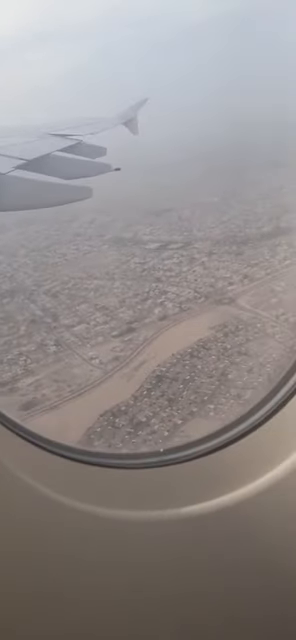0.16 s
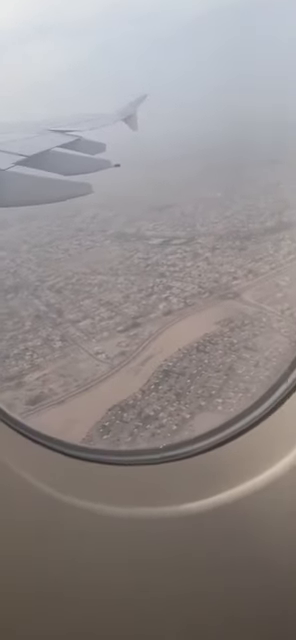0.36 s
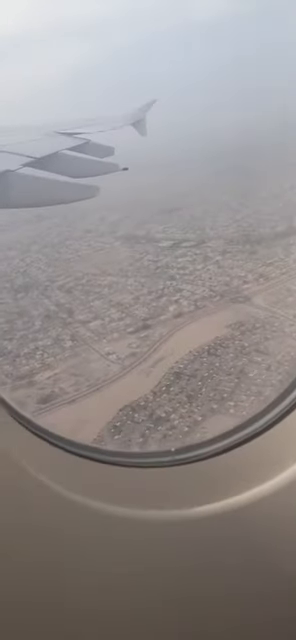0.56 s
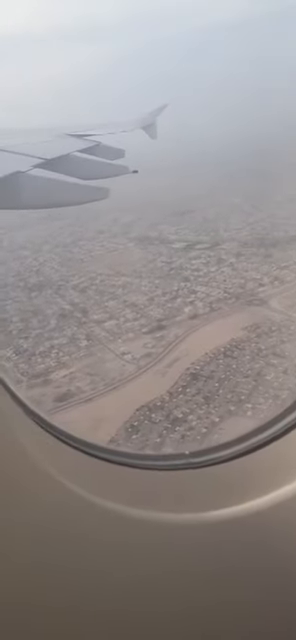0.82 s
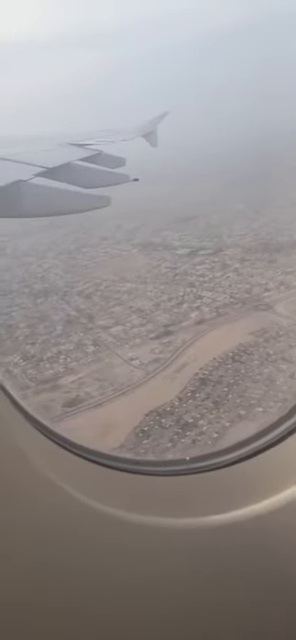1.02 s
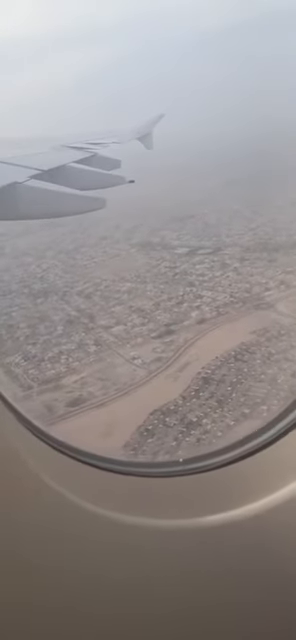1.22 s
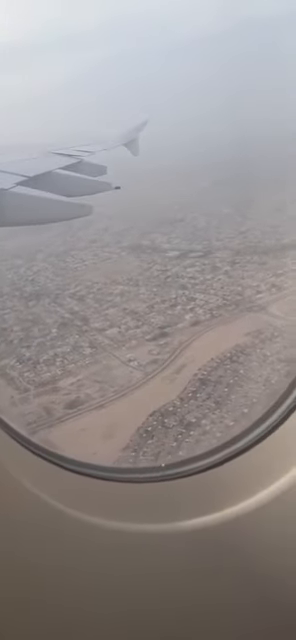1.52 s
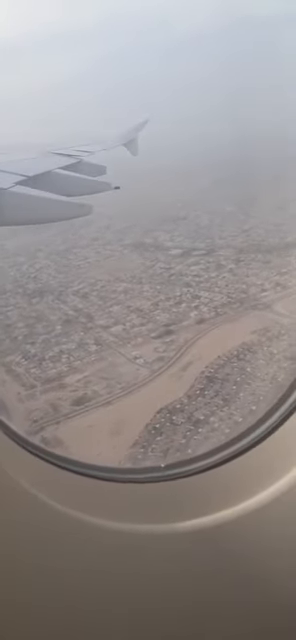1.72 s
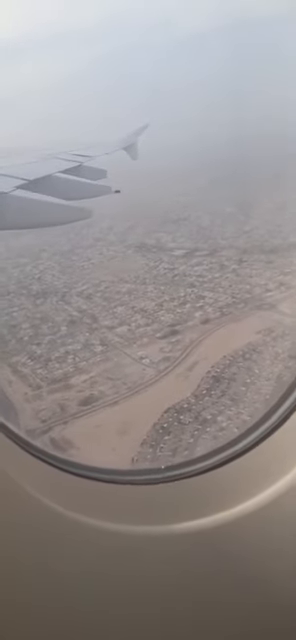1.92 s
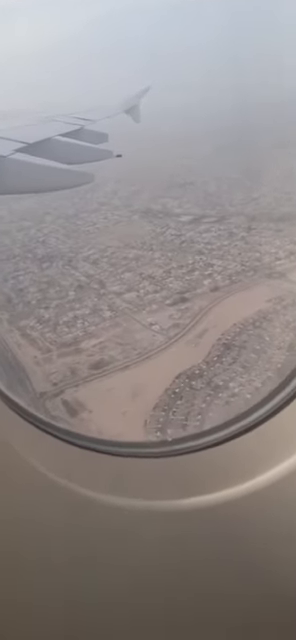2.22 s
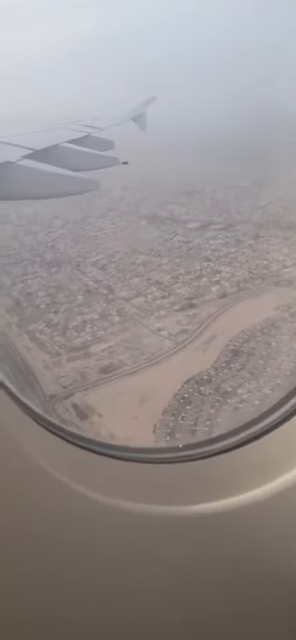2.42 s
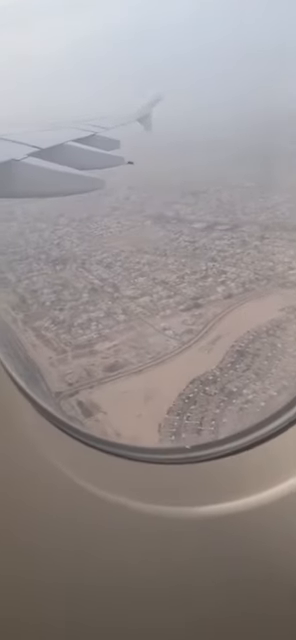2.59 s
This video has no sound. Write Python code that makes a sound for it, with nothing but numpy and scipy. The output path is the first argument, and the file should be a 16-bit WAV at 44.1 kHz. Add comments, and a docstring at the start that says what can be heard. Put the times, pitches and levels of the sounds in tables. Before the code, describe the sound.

Jet engine roar heard inside an airliner cabin at a window seat: deep, boomy rumble surging unevenly throughout, with muffled air rush, faint vent hiss and thin whines; close handheld stereo microphone, slightly stronger on the left.

```python
"""Jet exhaust rumbles through the fuselage of an airliner climbing after takeoff, heard behind the wing.
The rumble is shaped noise in four surging ranges; a narrow resonance throbs as the cabin's boom, with a
quieter hum about an octave below. Shaped noise also makes the air rush over the skin and the vent hiss.
Sines make the thin whines of spinning machinery; resonant noise makes a vent whistle and squeaks of the
trim, and short bursts of noise make its ticks."""
import sys
import numpy as np
from scipy import signal
from scipy.fft import rfft, irfft
from scipy.io import wavfile
from scipy.ndimage import uniform_filter1d

SR = 44100
rng = np.random.default_rng(int(sys.argv[2]) if len(sys.argv) > 2 else 0)


def inscribe(sig):
    """Save sig as 16-bit PCM at rate SR to the path in sys.argv[1].

    A 1-D sig is mono; a 2-D sig holds one channel per row.
    Samples are clipped to [-1, 1] before scaling.
    """
    pcm = np.round(np.clip(np.atleast_2d(sig).T, -1, 1) * 32767)
    wavfile.write(sys.argv[1], SR, pcm.astype(np.int16))


N = 121275
TIME = np.arange(N) / SR  # s
FREQS = np.maximum(np.arange(N // 2 + 1) * SR / N, 1)  # Hz, kept above zero for the logarithm


def from_db(db):
    """Decibels to gain."""
    return 10 ** (np.asarray(db) / 20)


def rms_one(x):
    """Scale to unit power."""
    return x / np.sqrt(np.mean(np.abs(x) ** 2) + 1e-20)


def at_hz(points, freqs=FREQS):
    """Read a table along log frequency."""
    hz, value = np.transpose(points)
    return np.interp(np.log(freqs), np.log(hz), value)


def over_time(points):
    """Read a table along time, with straight lines between its points."""
    return np.interp(TIME, *np.transpose(points))


def sides(pan_db):
    """Left and right gains for a level difference, left minus right."""
    return from_db(np.array([[.5], [-.5]]) * pan_db)


def drift(rate_hz):
    """Slow random movement with a spread of about 1: noise that falls away above rate_hz."""
    hz = np.arange(N + 1) * SR / (2 * N)
    noise = rfft(rng.standard_normal(2 * N))
    slow = irfft(noise / (1 + (hz / rate_hz) ** 2))
    return rms_one(slow)[:N]


def surge(level, swing):
    """Gain that follows a share of a level curve's swing about its mean."""
    db = over_time(level)
    return from_db(swing * (db - db.mean()))


def evened(x, steady):
    """Smooth out chance swells of noise; steady is 0-1."""
    power = np.mean(x ** 2, axis=0)
    for _ in range(2):
        power = uniform_filter1d(power, size=1800)  # about 41 ms
    return x * (power.mean() / power) ** (np.clip(steady, 0, 1) / 2)


def turbulence(spectrum, pan_db, likeness):
    """Stereo noise of a given density, balance and likeness between the sides."""
    mid, side = rfft(rng.standard_normal((2, N)))
    alike = np.clip(likeness, 0, 1)
    pair = np.sqrt(1 + alike) * mid + np.sqrt(1 - alike) * side * [[1], [-1]]
    density = from_db(at_hz(spectrum)) * np.sqrt(SR) / 2
    return irfft(pair * sides(pan_db) * density, N)


def resonance(hz, width_hz, steady):
    """Noise ringing in a narrow resonance whose centre may move; steady (0-1) evens out its swells."""
    swell = rms_one(drift(width_hz * .7) + 1j * drift(width_hz * .7))
    swell = swell / (np.abs(swell) ** 2 + 0.14) ** (np.clip(steady, 0, 1) / 2)
    phase = 2 * np.pi * np.cumsum(hz * np.ones(N)) / SR
    return rms_one((swell * np.exp(1j * phase)).real)


def right_later(x, lag):
    """Delay the right side by a lag that depends on frequency; the end is mirrored to avoid a jump."""
    hz = np.arange(N + 1) * SR / (2 * N)
    turn = np.exp(-2j * np.pi * hz * at_hz(lag, np.maximum(hz, 1)))
    mirrored = np.hstack([x[1], x[1, ::-1]])
    return np.array([x[0], irfft(rfft(mirrored) * turn)[:N]])


TRIM_PAN_DB = -14  # left minus right, for ticks and squeaks
TICK_RISE_S = 0.012
# faint ticks of the cabin trim: start_s, level_db, centre_hz
TRIM_TICKS = [(1.295, -50, 1400), (2.006, -50.5, 1710)]


def trim_ticks():
    """Plastic panels slip: brief soft bursts of noise in a band about an octave wide."""
    out = np.zeros((2, N))
    for start_s, level_db, centre_hz in TRIM_TICKS:
        age = np.maximum(TIME - start_s, 0) / TICK_RISE_S
        envelope = age * np.exp(1 - age)  # peaks at 1 after the rise time
        edges_hz = [centre_hz / np.sqrt(2), centre_hz * np.sqrt(2)]
        band = signal.butter(1, edges_hz, "band", fs=SR, output="sos")
        rub = signal.sosfilt(band, signal.sosfilt(band, rng.standard_normal((2, N))))
        out += from_db(level_db) * envelope * rms_one(rub)
    return out * sides(TRIM_PAN_DB)


SQUEAK_WIDTH_HZ, SQUEAK_STEADY = 25, .9  # steady: 0-1
# faint squeaks of the trim: middle_s, length_s, level_db, pitch_hz
TRIM_SQUEAKS = [(.16, .07, -47, 2920), (.335, .05, -55, 2900), (2.22, .05, -49.5, 2690),
                (2.04, .13, -65, 3815)]


def trim_squeaks():
    """A panel edge sings for a moment as it rubs: a narrow resonance under a flat-topped swell."""
    out = np.zeros(N)
    for middle_s, length_s, level_db, pitch_hz in TRIM_SQUEAKS:
        envelope = np.exp(-(2 * (TIME - middle_s) / length_s) ** 4)
        out += from_db(level_db) * envelope * resonance(pitch_hz, SQUEAK_WIDTH_HZ, SQUEAK_STEADY)
    return out * sides(TRIM_PAN_DB)


WHISTLE_HZ, WHISTLE_WIDTH_HZ, WHISTLE_STEADY = 2590, 40, .1  # steady: 0-1
WHISTLE_WANDER_HZ, WHISTLE_WANDER_RATE_HZ = 45, 11
WHISTLE_DB, WHISTLE_PAN_DB = -54.5, -12


def vent_whistle():
    """A breathy whistle wavers inside the hiss: a narrow resonance with a wandering centre."""
    hz = WHISTLE_HZ + WHISTLE_WANDER_HZ * drift(WHISTLE_WANDER_RATE_HZ)
    whistle = resonance(hz, WHISTLE_WIDTH_HZ, WHISTLE_STEADY)
    return from_db(WHISTLE_DB) * whistle * sides(WHISTLE_PAN_DB)


WHINE_WANDER, WHINE_WANDER_RATE_HZ = .0007, 5  # wander as a share of the speed
WHINE_FLICKER_DB, WHINE_FLICKER_RATE_HZ = 2.2, 6


def rotor_speed():
    """Relative speed of a rotor, wandering slightly about 1."""
    return 1 + WHINE_WANDER * drift(WHINE_WANDER_RATE_HZ)


def tone(hz, speed, db, pan_db):
    """A thin sine that follows a rotor's relative speed and flickers in level."""
    level = from_db(db + WHINE_FLICKER_DB * drift(WHINE_FLICKER_RATE_HZ))
    sine = np.sqrt(2) * np.sin(2 * np.pi * np.cumsum(hz * speed) / SR)
    return sine * level * sides(pan_db)


WHINE_TRIM_DB = 1.2
# whines of compressor and cabin blowers; level is before the trim, at mid-scene:
# pitch_hz, level_db, left_minus_right_db, rise_db_per_s
MACHINE_WHINES = [(2322, -51.5, -6, 1.4), (3310, -64, -9, 1), (6399, -74.5, -2, -1.5), (6464, -82, -3, -2),
                  (6525, -81, -6, -2), (6743, -73.5, 0, -1), (6928, -84, -8, 0)]


def machine_whines():
    """Compressor and blower whines, each wandering by itself and slowly rising, fading or holding."""
    out = np.zeros((2, N))
    for pitch_hz, level_db, pan_db, rise_db_per_s in MACHINE_WHINES:
        db = level_db + WHINE_TRIM_DB + rise_db_per_s * (TIME - TIME.mean())
        out += tone(pitch_hz, rotor_speed(), db, pan_db)
    return out


FAN_HZ, FAN_TRIM_DB = 61.87, -0.1  # shaft turns per second; level trim
# buzz tones of the engine fan, before the trim and swell:
# shaft_multiple, level_db, left_minus_right_db
FAN_TONES = [(18, -67.5, 4), (21, -60.7, -3), (31, -56.8, -3), (34, -65, -11), (44, -63, -12),
             (47, -67, -12), (65, -72.5, -5)]
# their shared swell: time_s, gain_db
FAN_SWELL = [(0, 2), (.8, 1), (1.5, 3.5), (2.75, 2)]


def fan_buzz():
    """Multiples of the fan's shaft rate, all wandering together because they share one shaft."""
    shaft = rotor_speed()
    out = np.zeros((2, N))
    for multiple, level_db, pan_db in FAN_TONES:
        out += tone(multiple * FAN_HZ, shaft, level_db + FAN_TRIM_DB, pan_db)
    return out * from_db(over_time(FAN_SWELL))


# colour of the vent hiss: pitch_hz, density_db_per_hz
HISS_COLOUR = [(1000, -104), (1750, -84), (2250, -78.5), (2460, -74.5), (2620, -76), (2800, -78),
               (3150, -80.5), (3600, -86.5), (4200, -88), (4800, -85), (5600, -93.5), (6800, -93.5),
               (7350, -100.5), (8000, -107.3), (10000, -109), (11800, -104.5), (15500, -111)]
# its place: pitch_hz, left_minus_right_db
HISS_PLACE = [(1800, -14), (2600, -12.5), (3200, -9.5), (4000, -3), (4800, -8.5), (6000, -5), (6900, -0.5),
              (8000, 6.5), (10000, 4), (12000, 5.5), (15000, -4.5)]
# how alike its two sides are: pitch_hz, likeness_0_to_1
HISS_ALIKE = [(2000, 0.16), (2500, 0.23), (2900, 0.51), (4800, 0.24), (7000, 0.082), (12000, .03)]


def vent_hiss():
    """Air hisses from the cabin vents: bright, steady turbulence."""
    return turbulence(HISS_COLOUR, at_hz(HISS_PLACE), at_hz(HISS_ALIKE))


RUSH_SWING = 0.54  # share of the level curve's swing that the rush follows
# colour of the outside air, before its surges: pitch_hz, density_db_per_hz
RUSH_COLOUR = [(30, -77.5), (120, -55.5), (300, -60.5), (440, -65), (510, -61), (590, -67.5), (750, -65.5),
               (880, -70.5), (1020, -75), (1400, -78.5), (1800, -84.5), (3000, -97.5), (6000, -130)]
# its surges, of which only the swing about the mean is used: time_s, level_db
RUSH_SURGES = [(0.03, -40.5), (0.19, -34.5), (0.21, -45), (0.27, -37.5), (0.53, -41), (0.54, -41),
               (0.75, -40), (0.82, -31.5), (0.84, -39.5), (1.69, -43), (1.7, -36.5), (1.79, -45),
               (1.83, -41.5), (1.85, -40), (2.16, -39), (2.24, -39.5), (2.69, -39.5), (2.7, -41)]
# its place: pitch_hz, left_minus_right_db
RUSH_PLACE = [(380, -5), (520, -1.5), (720, 0), (1000, -1.5), (1600, -6)]
# how alike its two sides are: pitch_hz, likeness_0_to_1
RUSH_ALIKE = [(300, 0.57), (430, 0.88), (650, 0.41), (860, 0.23), (1050, 0.49), (1400, 0.15)]


def air_rush():
    """Air rushes over the fuselage: turbulence that surges."""
    rush = turbulence(RUSH_COLOUR, at_hz(RUSH_PLACE), at_hz(RUSH_ALIKE))
    return rush * surge(RUSH_SURGES, RUSH_SWING)


RUSH_FLUTTER_DB, HISS_FLUTTER_DB, FLUTTER_RATE_HZ = 0.93, 0.5, 20


def airflow():
    """The rush outside and the vent hiss inside, each fluttering slightly on its own."""
    rush, hiss = air_rush(), vent_hiss()
    rush = rush * from_db(RUSH_FLUTTER_DB * drift(FLUTTER_RATE_HZ))
    hiss = hiss * from_db(HISS_FLUTTER_DB * drift(FLUTTER_RATE_HZ))
    return rush + hiss


HUM_HZ, HUM_WIDTH_HZ, HUM_STEADY = 112, 9, .8  # steady: 0-1
HUM_DB, HUM_SWING = -31.5, 1  # level before the surges; share of the deep surges it follows
BOOM_WIDTH_HZ, BOOM_STEADY, BOOM_TRIM_DB, BOOM_PAN_DB = 21, .9, -2.2, -5.3
# throb of the boom before its trim; its swing also drives one rumble range: time_s, level_db
BOOM_THROB = [(0.0, -25.5), (0.08, -36.5), (0.14, -20), (0.27, -17), (0.36, -23), (0.5, -14.5), (0.6, -28),
              (0.66, -16), (0.69, -20.5), (0.9, -23.5), (0.95, -10.5), (0.96, -23.5), (1.08, -18),
              (1.11, -29), (1.15, -15), (1.29, -26), (1.35, -12.5), (1.38, -21), (1.46, -15), (1.55, -27.5),
              (1.59, -15.5), (1.62, -22), (1.65, -17), (1.71, -28.5), (1.75, -16.5), (1.88, -18),
              (1.9, -26.5), (2.07, -14.5), (2.1, -21), (2.3, -17.5), (2.34, -13), (2.38, -24.5),
              (2.41, -16.5), (2.57, -24.5), (2.61, -15.5), (2.75, -23.5)]
# the boom's wavering centre: time_s, pitch_hz
BOOM_WAVER = [(0, 227.6), (.2, 240.4), (.35, 223.2), (.5, 228), (.85, 219.4), (.95, 234), (1.05, 220),
              (1.17, 231.4), (1.45, 223), (1.65, 237.9), (1.85, 214.2), (2.05, 229.7), (2.32, 224.7),
              (2.48, 242.5), (2.6, 228), (2.75, 232.2)]


def cabin_boom():
    """A cabin resonance throbs and wavers over a quieter hum that swells with the deep rumble."""
    boom = resonance(over_time(BOOM_WAVER), BOOM_WIDTH_HZ, BOOM_STEADY)
    boom = boom * from_db(over_time(BOOM_THROB) + BOOM_TRIM_DB)
    hum = resonance(HUM_HZ, HUM_WIDTH_HZ, HUM_STEADY)
    hum = hum * from_db(HUM_DB) * surge(DEEP_SURGES, HUM_SWING)
    return (boom + hum) * sides(BOOM_PAN_DB)


RUMBLE_PAN_DB, RUMBLE_STEADY = -4.5, .75  # steady: 0-1
# colour of the exhaust through the wall, before its surges: pitch_hz, density_db_per_hz
RUMBLE_COLOUR = [(22, -108), (29, -89.5), (38, -60), (62, -52.5), (88, -44.5), (130, -50), (162, -43),
                 (182, -50.5), (205, -44), (230, -45), (255, -41.5), (280, -43.5), (315, -51.5),
                 (352, -50.5), (415, -68), (600, -94.5), (1500, -150)]
# how alike its two sides are: pitch_hz, likeness_0_to_1
RUMBLE_ALIKE = [(60, .985), (160, .95), (240, .94), (300, .96), (420, .75)]
# deep, drone, boom and upper ranges: top_hz, swing (share of the surge curve followed)
RANGES = [(138, .75), (192, .8), (258, .6), (1500, .8)]
# surges of the deep range (shared with the hum), drone and upper ranges,
# used only as swing about the mean: time_s, level_db
DEEP_SURGES = [(0.0, -45.5), (0.05, -23), (0.33, -30.5), (0.34, -27), (0.52, -22.5), (0.54, -34.5),
               (0.63, -21), (0.69, -25), (0.72, -27), (0.89, -29.5), (0.91, -27.5), (1.01, -26.5),
               (1.15, -27), (1.18, -33), (1.23, -18.5), (1.35, -32), (1.41, -27.5), (1.75, -29.5),
               (1.83, -19), (1.88, -31.5), (1.92, -18), (1.96, -30), (2.41, -24.5), (2.49, -31.5),
               (2.58, -20), (2.75, -31)]
DRONE_SURGES = [(0.0, -29), (0.2, -20.5), (0.3, -30.5), (0.32, -20.5), (0.41, -46.5), (0.47, -27.5),
                (0.9, -33), (1.0, -21.5), (1.09, -27), (1.13, -18), (1.25, -33), (2.01, -30.5),
                (2.04, -17.5), (2.07, -26), (2.44, -33.5), (2.47, -16.5), (2.6, -34.5), (2.75, -32)]
UPPER_SURGES = [(0.0, -24.5), (0.2, -25), (0.28, -29), (0.31, -22), (0.38, -37.5), (0.42, -26), (0.88, -31),
                (0.91, -25), (1.05, -32), (1.16, -26.5), (1.64, -26), (1.66, -24), (1.69, -34.5),
                (1.76, -21.5), (1.79, -32), (1.92, -24.5), (1.95, -25.5), (1.99, -26.5), (2.32, -26.5),
                (2.34, -33.5), (2.51, -20.5), (2.61, -30), (2.66, -24), (2.75, -25.5)]


def exhaust_rumble():
    """Jet exhaust roar, nearly alike on both sides; four ranges surge by separate curves, the third with the boom."""
    remaining = turbulence(RUMBLE_COLOUR, RUMBLE_PAN_DB, at_hz(RUMBLE_ALIKE))
    out = np.zeros((2, N))
    surges = (DEEP_SURGES, DRONE_SURGES, BOOM_THROB, UPPER_SURGES)
    for level, (top_hz, swing) in zip(surges, RANGES):
        part = irfft(rfft(remaining) / (1 + (FREQS / top_hz) ** 30), N)  # steep low-pass
        out += evened(part, RUMBLE_STEADY) * surge(level, swing)
        remaining = remaining - part
    return out


# how much later the noises reach the right side: pitch_hz, lag_s
NOISE_LAG = [(110, .00029), (240, .00019), (350, .0002), (730, .00023), (1000, .00037), (3000, .000385)]
# the same for the whines and fan tones: pitch_hz, lag_s
TONE_LAG = [(2000, .00017)]


def scene():
    """Everything as heard at the window seat, reaching the left side first."""
    noises = exhaust_rumble() + cabin_boom() + airflow()
    noises = noises + vent_whistle() + trim_ticks() + trim_squeaks()
    tones = fan_buzz() + machine_whines()
    return right_later(noises, NOISE_LAG) + right_later(tones, TONE_LAG)


CUTOFF_HZ = 15750


def record(dry):
    """Cut the top steeply with an elliptic low-pass."""
    low_pass = signal.ellip(10, .1, 80, CUTOFF_HZ, fs=SR, output="sos")
    return signal.sosfilt(low_pass, dry)


dry = scene()
out = record(dry)
inscribe(out)
```